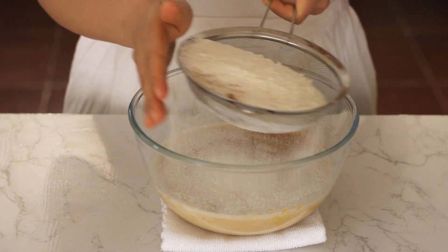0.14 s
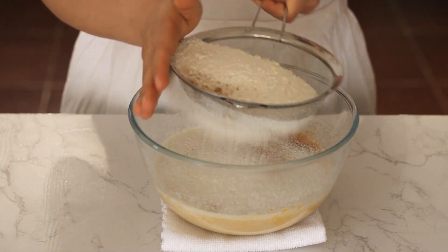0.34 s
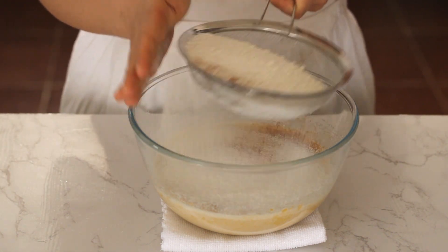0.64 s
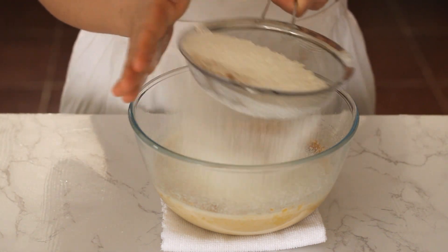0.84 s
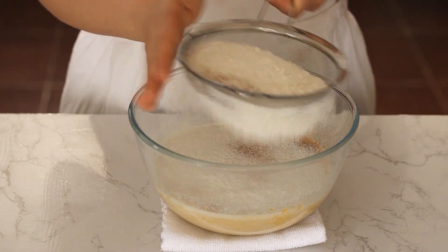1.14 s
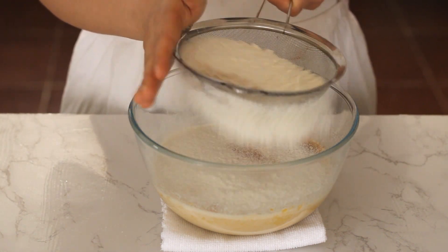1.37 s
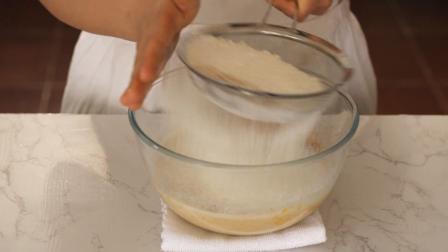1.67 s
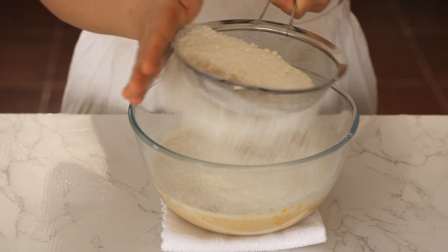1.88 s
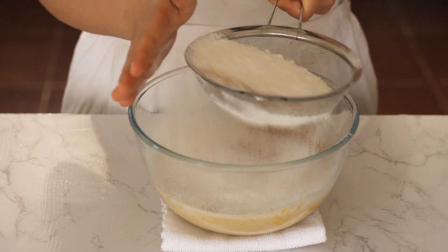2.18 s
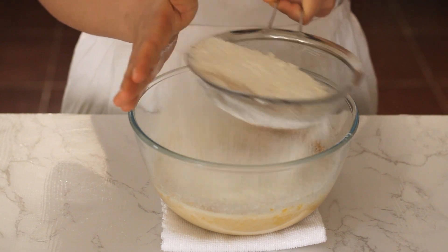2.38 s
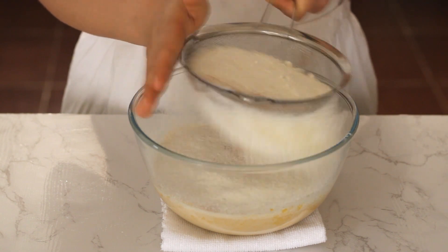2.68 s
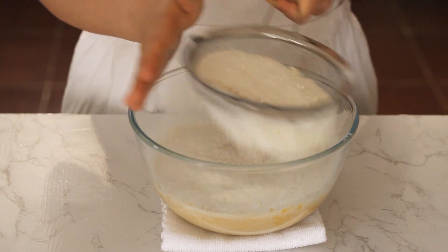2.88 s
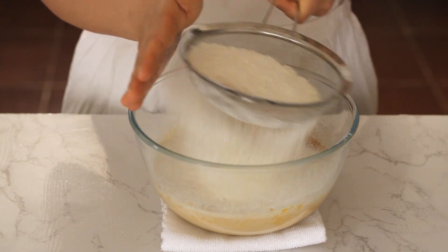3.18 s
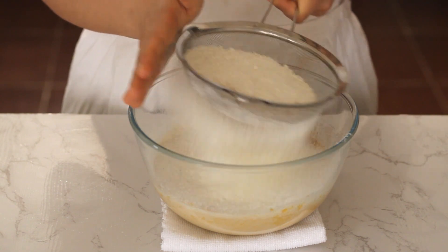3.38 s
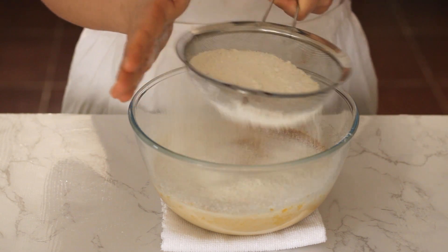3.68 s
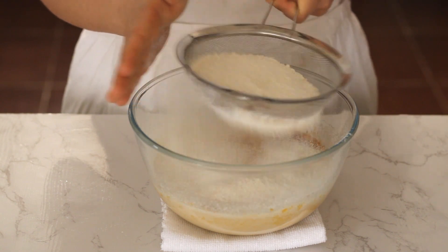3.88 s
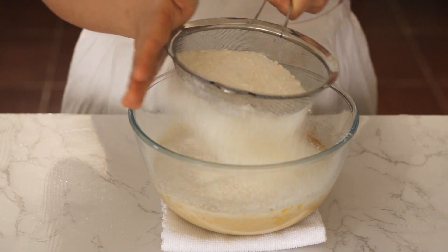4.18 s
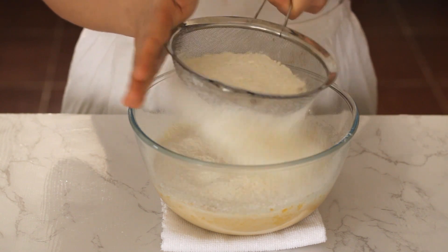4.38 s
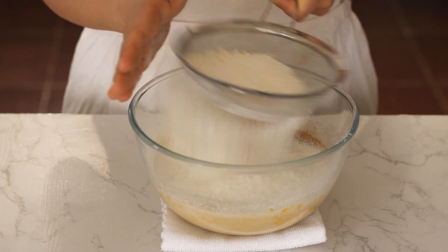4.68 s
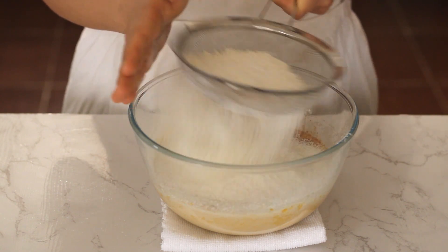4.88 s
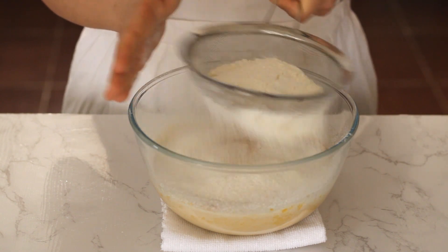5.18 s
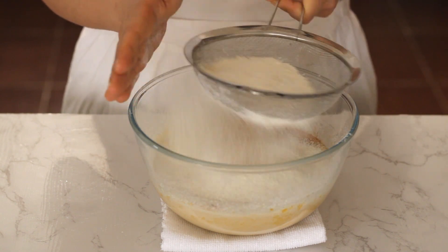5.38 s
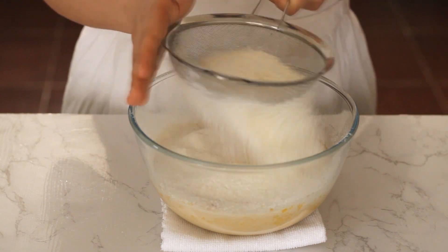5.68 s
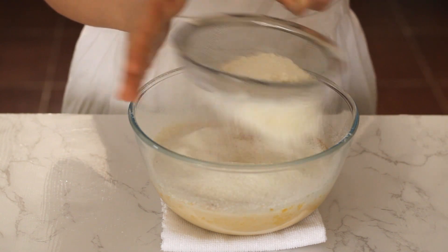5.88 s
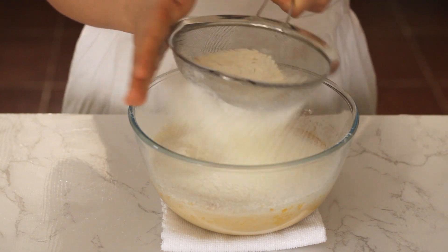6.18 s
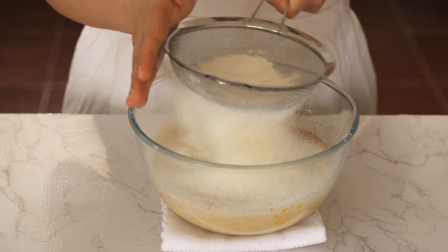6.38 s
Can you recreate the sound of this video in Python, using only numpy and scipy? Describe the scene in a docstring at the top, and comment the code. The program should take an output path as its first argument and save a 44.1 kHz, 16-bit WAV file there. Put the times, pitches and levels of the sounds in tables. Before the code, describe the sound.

Rhythmic sieving of flour heard from close by: dull palm thumps, muted rim clinks and brief hissing bursts, nearly even, about five per second. Later the taps become lighter and crisper and flour slides over the mesh between them, landing with very soft puffs in a bowl. Quiet indoor room tone, faint hum and occasional deep rumble underneath.

```python
"""Flour shaken through a metal sieve

A metal sieve full of flour is swung against a palm about five times a second, close by in a kitchen.
The flour is band-shaped noise that slides over the mesh, hisses when a blow shakes it, then lands in the bowl.
Each blow is a pair of short pushes and rough skin contact that set decaying modes of mesh and rim ringing.
Behind it lie restless room noise and wavering tones: a thin whine, a faint hum with airy noise, low rumbles.
The whole signal rides on a large steady offset that bulges once early on."""
import sys
import numpy as np
from scipy import signal
from scipy.fft import rfft, irfft
from scipy.io import wavfile
from scipy.ndimage import uniform_filter1d

SR = 44100
rng = np.random.default_rng(int(sys.argv[2]) if len(sys.argv) > 2 else 0)


def inscribe(sig):
    """Save sig as 16-bit PCM at rate SR to the path in sys.argv[1].

    A 1-D sig is mono; a 2-D sig holds one channel per row.
    Samples are clipped to [-1, 1] before scaling.
    """
    pcm = np.round(np.clip(np.atleast_2d(sig).T, -1, 1) * 32767)
    wavfile.write(sys.argv[1], SR, pcm.astype(np.int16))


def amplitude_ratio(level_db):
    """Convert a level in decibels to the matching linear amplitude (field) ratio."""
    exponent = np.asarray(level_db, float) / 20
    return 10 ** exponent


N = 288414  # samples

# Room noise spectrum. Each row: frequency in Hz, relative density in dB per Hz.
ROOM_SPECTRUM = [(12, 9), (30, -5.5), (60, -3), (130, -4.5), (210, -11.5), (350, -11), (500, -17),
                 (700, -15), (950, -21), (1600, -26.5), (2000, -25.5), (3500, -32.5), (7000, -38),
                 (15000, -45)]
# Where the kitchen booms, rings or dips. Each row: centre in Hz, half-width in Hz, lift in dB.
ROOM_MODES = [(37, 5, -0.5), (76.6, 3.1, 9), (124.1, 4.4, 5.5), (173.7, 7.1, 4), (312, 20, -1.5),
              (1290, 140, 3.5)]
# Thin whine of a distant machine. Each row: time in seconds, pitch in Hz, level in dB before its waver.
WHINE_PATH = [(0, 2117, -74), (0.199, 2135, -71), (.23, 2254, -73), (.75, 2223, -70), (1.6, 2234, -67),
              (2.2, 2250, -66.5), (2.799, 2236, -69), (3.4, 2214, -71.5), (4.6, 2224, -66),
              (5.451, 2217, -66), (5.7, 2220, -71), (6.1, 2247, -67), (6.54, 2243, -67)]
# Swell and fade of the hum. Each row: time in seconds, level in dB before its waver.
HUM_LEVELS = [(0, -64), (.4, -63.5), (.8, -55.5), (1.6, -58.5), (2.6, -61), (3.2, -56.5), (3.7, -63.5),
              (4.75, -56.5), (4.9, -66), (6.54, -76.5)]
# Deep rumbles from outside. Each row: centre in seconds, level in dB before waver, half-width in ms.
RUMBLES = [(.5, -56, 496), (1.45, -58, 150), (1.781, -46.5, 68), (1.97, -43.5, 38), (5.95, -45, 92),
           (6.5, -47.5, 126)]
# Palm meets rim. Each row: time in seconds, then relative levels in dB of shaken flour, thump and rim ring.
BLOWS = [(0.397, -59, -46.5, -57.5), (0.623, -55.5, -53.5, -72), (0.838, -51, -52.5, -59),
         (1.049, -50.5, -49.5, -56.5), (1.265, -52.5, -50.5, -53.5), (1.486, -51, -47.5, -56.5),
         (1.701, -51.5, -49, -53.5), (1.925, -52, -45, -54), (2.138, -50.5, -44.5, -52),
         (2.354, -49.5, -44.5, -53), (2.579, -52.5, -47.5, -53.5), (2.795, -52.5, -49, -68),
         (3.014, -50.5, -52, -60), (3.206, -51.5, -51.5, -65), (3.422, -50.5, -54.5, -62),
         (3.632, -51.5, -59, -60), (3.846, -51.5, -54.5, -61), (4.043, -53, -49.5, -62),
         (4.241, -54, -52.5, -74), (4.452, -51.5, -50.5, -69), (4.682, -47, -51.5, -58),
         (4.902, -51.5, -51, -60), (5.118, -50.5, -50.5, -68), (5.354, -49.5, -51, -62),
         (5.576, -52.5, -51, -62), (5.797, -52, -53.5, -67), (6.016, -52.5, -61, -58),
         (6.251, -51, -58, -67), (6.477, -52.5, -60.5, -64)]
# Swings on which loosened flour slides audibly. Each row: centre in seconds, level in dB.
SLIDES = [(2.77, -62), (2.966, -70), (3.179, -62), (3.4, -62), (3.592, -69.5), (3.802, -73), (4.014, -60.5),
          (4.228, -67.5), (4.436, -60.5), (4.658, -65.5), (4.877, -60.5), (5.105, -61.5), (5.296, -63),
          (5.545, -59), (5.775, -64.5), (5.99, -59.5), (6.223, -63), (6.44, -60.5)]
# The heap sliding: a soft rush under a thin hiss. Each row: frequency in Hz, relative density in dB per Hz.
HEAP_SPECTRUM = [(250, -4), (600, 10.5), (1100, 7.5), (2000, -1), (4000, -2), (6800, -1.5), (7800, 3.5),
                 (9000, -1), (12000, -2.5), (14500, -7), (16000, -16)]
# Low modes of loaded mesh and frame. Each row: frequency in Hz, relative level in dB, t60 in seconds.
BODY_MODES = [(129, -2, 0.027), (185, -21, 0.027), (233, -2.5, 0.023), (282, -2.5, 0.041),
              (330, 4.5, 0.038), (435, 6, 0.053), (542, 4, 0.052), (651, 4.5, 0.079), (800, -0.5, 0.054),
              (1057, 2, 0.039), (1330, -9, 0.035)]
# Steel rim, damped by the flour. Each row: frequency in Hz, relative level in dB, t60 in seconds.
RIM_MODES = [(1620, -6, 0.013), (2011, 1, 0.058), (2060, -2, 0.058), (2125, 3, 0.046), (2263, 4, 0.031),
             (2630, -5, 0.025), (3200, -12, 0.011)]
# Grains shaken on fine wire mesh. Each row: frequency in Hz, relative density in dB per Hz.
MESH_SPECTRUM = [(300, -6), (1000, -1.5), (2500, -1.5), (4000, -1.5), (6000, 1), (7800, 1.5), (9500, -1),
                 (12000, -2), (14500, -3.5), (16000, -22)]
# Air in the bowl. Each row: frequency in Hz, relative density in dB per Hz.
BOWL_SPECTRUM = [(300, -32), (480, -0.5), (620, 1), (720, 3.5), (800, -7), (950, -16.5), (1400, -23),
                 (2500, -50)]

ROOM_DB = -50
HUM_HZ, RUMBLE_HZ = 254.7, 35.4
# every swing drags the heap a little just before the blow
CREEP_DB, CREEP_LEAD_S, CREEP_HALF_MS = -70, 0.028, 29
SLIDE_HALF_MS = 26
# the emptier the sieve, the shorter the contact and the longer the loose flour dances
CONTACT_FULL_MS, CONTACT_LIGHT_MS, LIGHTER_AT_S, LIGHTER_OVER_S = 3.15, 1.31, 2.5, 0.39
SETTLE_MS, SETTLE_GAIN_MS_PER_S = 15.1, 1.7
SLAM_S = 0.009  # the flour lags the rim and slams into it about this much later
# flour lands softly in the bowl: a sheet some time after each blow, and a spill with each slide
FALL_S, LANDING_HALF_MS = 0.13, 20.4
SHEET_DB, SHEET_FADE_DB_PER_S, SHEET_SCATTER_DB = -55, 2.5, 2.5
SPILL_DB = 4  # spill over its slide
OFFSET, BULGE = 0.4288, 0.1835  # of full scale
BULGE_PEAK_S, BULGE_HALF_S = 0.397, 0.5


def level(x, db):
    """Scale to an rms level in dB."""
    return x * amplitude_ratio(db) / np.sqrt(np.mean(x ** 2))


def colour(x, points):
    """Filter by a (Hz, dB) spectrum drawn on a log-frequency axis."""
    hz, db = np.transpose(points)
    bins = np.maximum(np.arange(N // 2 + 1) * SR / N, 1)
    gain = amplitude_ratio(np.interp(np.log(bins), np.log(hz), db))
    return irfft(rfft(x) * gain, N)


def walk(rate):
    """Random values held 1 / rate s and smoothed twice; spread near 1."""
    hold = int(SR / rate)
    steps = np.repeat(rng.standard_normal(N // hold + 1), hold)
    return 1.09 * uniform_filter1d(uniform_filter1d(steps, hold), hold)[:N]


def restless(x, per_octave, depth_db, rate):
    """Split into overlapping bands whose levels wander on their own by depth_db(octaves above 16 Hz)."""
    bins = np.maximum(np.arange(N // 2 + 1) * SR / N, 1)
    place = per_octave * np.log2(bins / 16)
    spectrum = rfft(x)
    total = 0
    for k in range(11 * per_octave):
        window = np.cos(np.pi / 2 * np.clip(place - k, -1, 1)) ** 2
        band = irfft(spectrum * window, N)
        total = total + amplitude_ratio(depth_db(k / per_octave) * walk(rate)) * band
    return total


def humps(t, rows):
    """Amplitude of bell-shaped swells (centre s, dB, half-width ms); power is 1/e at the half-width."""
    return np.sqrt(sum(amplitude_ratio(db) ** 2 * np.exp(-(1000 * (t - s) / ms) ** 2) for s, db, ms in rows))


def swell(t, rise, fall):
    """Quick rise and exponential fall, silent before t = 0."""
    t = np.maximum(t, 0)
    return (1 - np.exp(-t / rise)) * np.exp(-t / fall)


def tone(hz, gain, waver_db, rate):
    """A sine of the given pitch and rms gain whose level wavers."""
    phase = 2 * np.pi * np.cumsum(hz * np.ones(N)) / SR
    return np.sqrt(2) * gain * amplitude_ratio(waver_db * walk(rate)) * np.sin(phase)


def room():
    """Noise whose bass is the most restless, shaped by the room's resonances."""
    noise = restless(rng.standard_normal(N), per_octave=1, rate=11,
                     depth_db=lambda octave: 0.47 * min(7.3 / (octave + 1), 1) ** 3)
    bins = np.arange(N // 2 + 1) * SR / N
    lift_db = sum(db / (1 + ((bins - hz) / width) ** 2) for hz, width, db in ROOM_MODES)
    resonant = irfft(rfft(colour(noise, ROOM_SPECTRUM)) * amplitude_ratio(lift_db), N)
    return level(resonant, ROOM_DB)


def whine(t):
    """A thin tone of a distant machine, drifting in pitch and level."""
    s, hz, db = np.transpose(WHINE_PATH)
    return tone(np.interp(t, s, hz), amplitude_ratio(np.interp(t, s, db)), waver_db=0.87, rate=15)


def hum(t):
    """A faint tone whose pitch and level waver slowly."""
    hz = HUM_HZ * (1 + 0.00316 * walk(2.916))
    return tone(hz, amplitude_ratio(np.interp(t, *np.transpose(HUM_LEVELS))), waver_db=0.91, rate=3.02)


def hum_air(t):
    """Air noise around the hum that swells and fades with it, less deeply."""
    s, db = np.transpose(HUM_LEVELS)
    rush = colour(rng.standard_normal(N), [(120, -4), (190, 1.0), (260, -3.0), (450, -3.5), (700, -37.5)])
    return amplitude_ratio(0.63 * np.interp(t, s, db)) * level(rush, -26)


def rumble(t):
    """A deep wavering tone that swells from outside."""
    return tone(RUMBLE_HZ, humps(t, RUMBLES), waver_db=1.9, rate=5)


def grains(spectrum):
    """Countless grains of uneven size ticking on the wires, in clumps of their own pitch; rms 1 in the treble."""
    sizes_db = 1.7 * rng.exponential(size=N)
    ticks = rng.standard_normal(N) * amplitude_ratio(sizes_db + 0.9 * walk(250))
    ticks = restless(ticks, per_octave=2, depth_db=lambda octave: 2.5, rate=110)
    ticks = colour(ticks, spectrum)
    treble = colour(ticks, [(3900, -60), (4000, 0), (14000, 0), (14500, -60)])
    return ticks / np.std(treble)


def sliding_heap(t):
    """The heap creeps before every blow and, on some swings, slides audibly over the mesh."""
    creeps = [(s - CREEP_LEAD_S, CREEP_DB, CREEP_HALF_MS) for s, *_ in BLOWS]
    slides = [(s, db, SLIDE_HALF_MS) for s, db in SLIDES]
    return humps(t, creeps + slides) * grains(HEAP_SPECTRUM)


def contact_ms(s):
    """How long the palm stays on the rim: shorter as the sieve empties."""
    fullness = 1 / (1 + np.exp((s - LIGHTER_AT_S) / LIGHTER_OVER_S))
    return CONTACT_LIGHT_MS + (CONTACT_FULL_MS - CONTACT_LIGHT_MS) * fullness


def push(t, ms):
    """A smooth push of unit area; a longer contact is duller."""
    turn = np.clip(1000 * t / ms - 0.5, -0.5, 0.5)
    return (1 + np.cos(2 * np.pi * turn)) * 1000 / (ms * SR)


def ring(force, modes):
    """A force sets decaying modes going; their summed reply has unit power gain."""
    t = np.arange(SR // 8) / SR
    reply = 0
    for hz, db, t60 in modes:
        decay = np.exp(-np.log(1000) * t / t60)
        reply = reply + amplitude_ratio(db) * decay * np.sin(2 * np.pi * hz * t)
    return signal.fftconvolve(force, reply / np.sqrt(np.sum(reply ** 2)))[:N]


def blows(t):
    """Two knocks a blow, palm on rim and then flour on rim, with rough skin contact between them."""
    rough = rng.standard_normal((2, N))
    chance = rng.standard_normal((len(BLOWS), 3))
    thump, clink = 0, 0
    for (s, _, thump_db, rim_db), (slam_luck, tick_luck, delay_luck) in zip(BLOWS, chance):
        ms = contact_ms(s)
        slam_t = t - s - SLAM_S - 0.001173 * delay_luck
        skin = swell(t - s + 0.0028, 0.0077, 0.013) * rough

        # the flour pushes the rim opposite to the palm
        knocks = amplitude_ratio(-3.0 + 2.0 * slam_luck) * push(slam_t + 0.00096, ms) - push(t - s + 0.00033, ms)
        soft = int(ms * SR / 2000) + 1  # flesh that gives for longer also muffles the rubbing
        rubbing = np.sqrt(soft) * uniform_filter1d(skin[0], soft)
        thump = thump + amplitude_ratio(thump_db) * (amplitude_ratio(30.5) * knocks + amplitude_ratio(-2.5) * rubbing)

        ticks = push(t - s - 0.0015, 0.26) + amplitude_ratio(-3.5 + 2.4 * tick_luck) * push(slam_t - 0.0003, 0.3)
        clink = clink + amplitude_ratio(rim_db) * (amplitude_ratio(24.5) * ticks + skin[1])
    return ring(thump, BODY_MODES) + ring(clink, RIM_MODES)


def shaken_flour(t):
    """A blow throws grains up with a snap, then they settle on the mesh."""
    power = 0
    for s, flour_db, _, rim_db in BLOWS:
        snap = amplitude_ratio(rim_db - 3.0) * np.exp(-((t - s - 0.010) / 0.0029) ** 2)  # a hard rim hit snaps harder
        settle_s = (SETTLE_MS + SETTLE_GAIN_MS_PER_S * s) / 1000
        hiss = amplitude_ratio(flour_db) * swell(t - s, 0.0077, settle_s)
        power = power + hiss ** 2 + snap ** 2
    return np.sqrt(power) * grains(MESH_SPECTRUM)


def falling_flour(t):
    """Sheets and spills of flour puff the air in the bowl as they land."""
    sheets = []
    for (s, *_), luck in zip(BLOWS, rng.standard_normal(len(BLOWS))):
        db = SHEET_DB - SHEET_FADE_DB_PER_S * s + SHEET_SCATTER_DB * luck
        sheets.append((s + FALL_S, db, LANDING_HALF_MS))
    spills = [(s, db + SPILL_DB, LANDING_HALF_MS) for s, db in SLIDES]
    puff = level(colour(rng.standard_normal(N), BOWL_SPECTRUM), 0)
    return humps(t, sheets + spills) * puff


def scene():
    """Room and machines behind, sieve in front."""
    t = np.arange(N) / SR
    behind = room() + whine(t) + hum(t) + hum_air(t) + rumble(t)
    sieve = sliding_heap(t) + blows(t) + shaken_flour(t) + falling_flour(t)
    return (behind + sieve)[None]


def roll_off(x):
    """The treble ends steeply here."""
    return signal.sosfilt(signal.butter(12, 15760, fs=SR, output="sos"), x)


def record(dry):
    """The signal rides on a steady offset that bulges once in the first second."""
    t = np.arange(N) / SR
    bulge = BULGE * np.cos(np.pi / 2 * np.minimum(np.abs(t - BULGE_PEAK_S) / BULGE_HALF_S, 1))
    return roll_off(dry + OFFSET + bulge)


dry = scene()
out = record(dry)
inscribe(out)
```